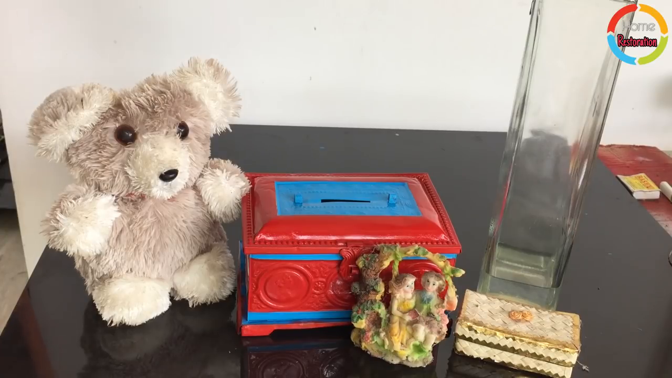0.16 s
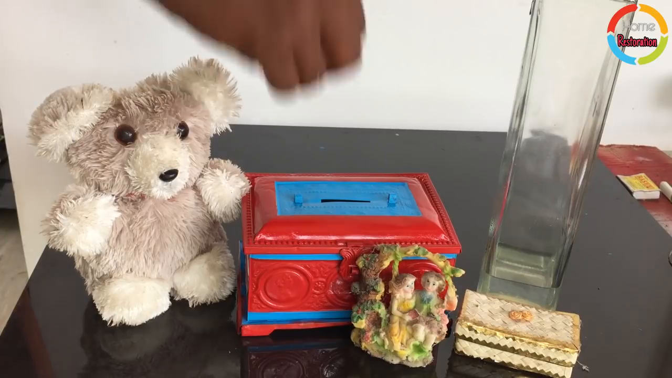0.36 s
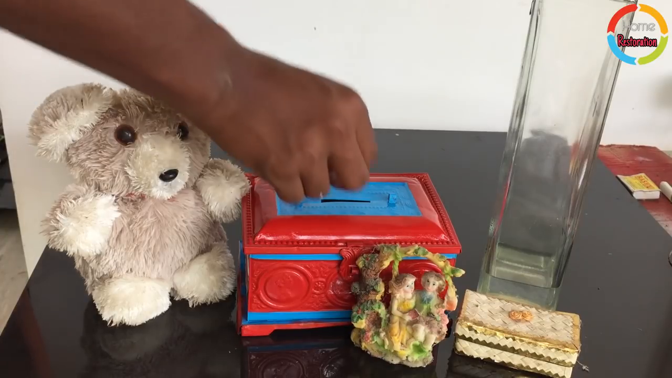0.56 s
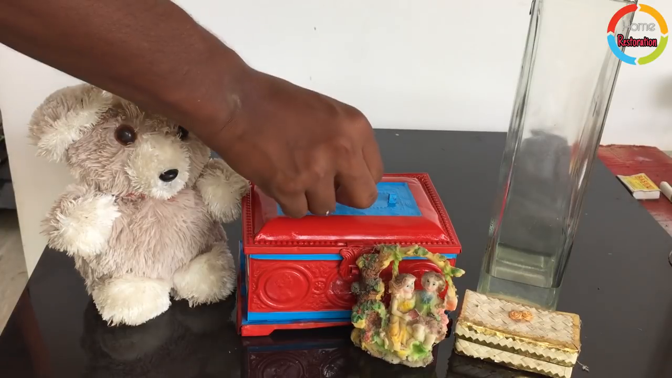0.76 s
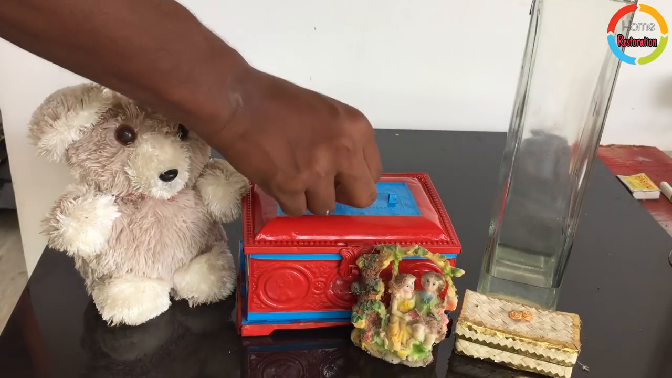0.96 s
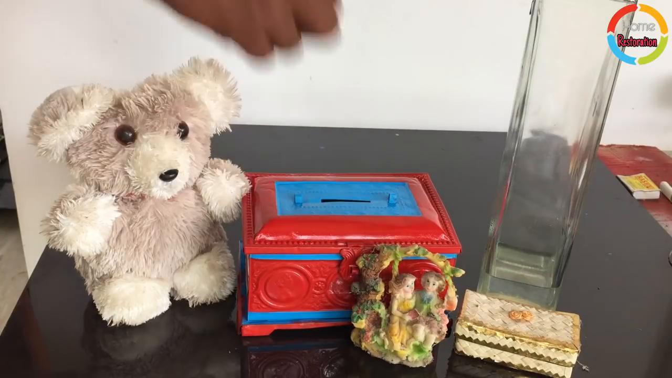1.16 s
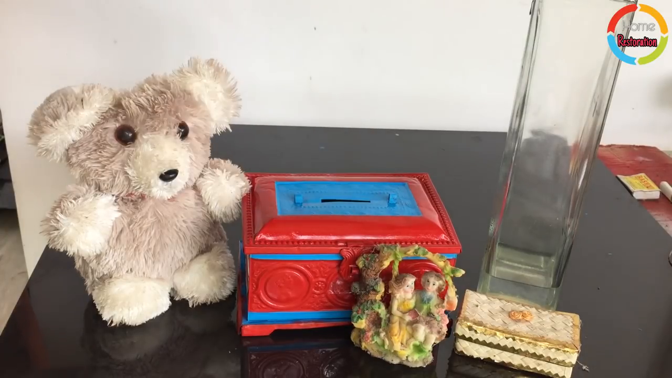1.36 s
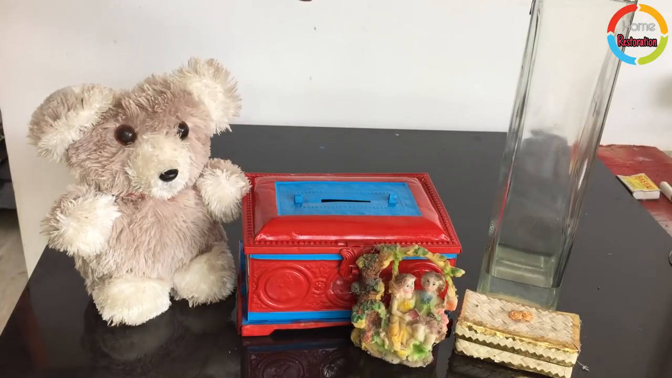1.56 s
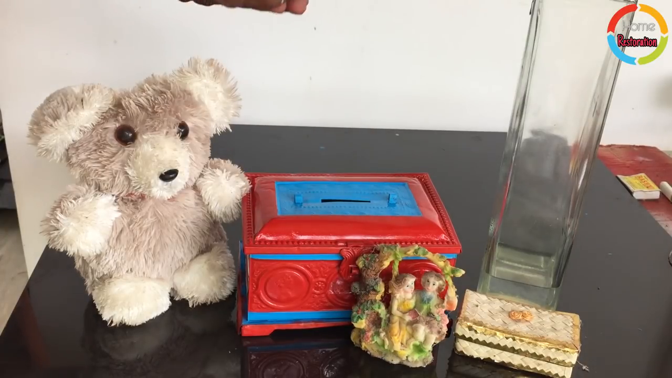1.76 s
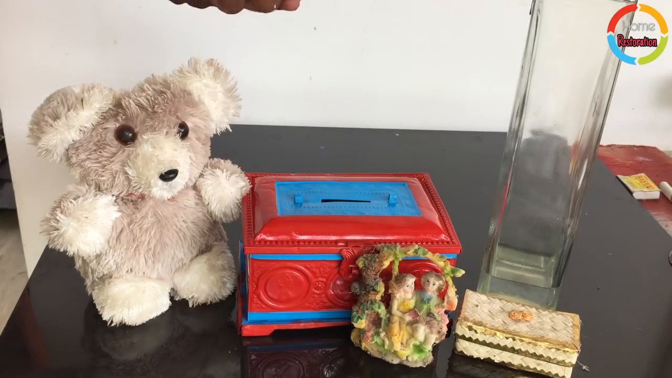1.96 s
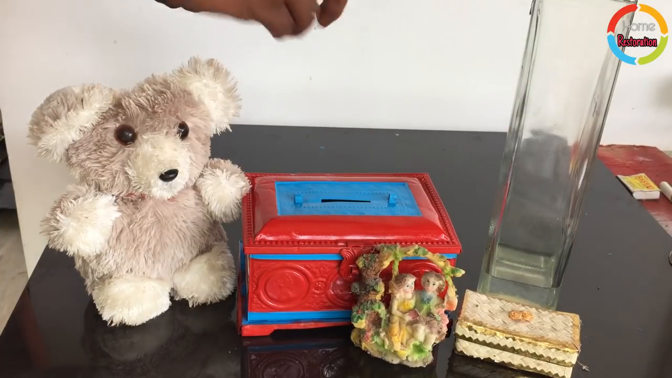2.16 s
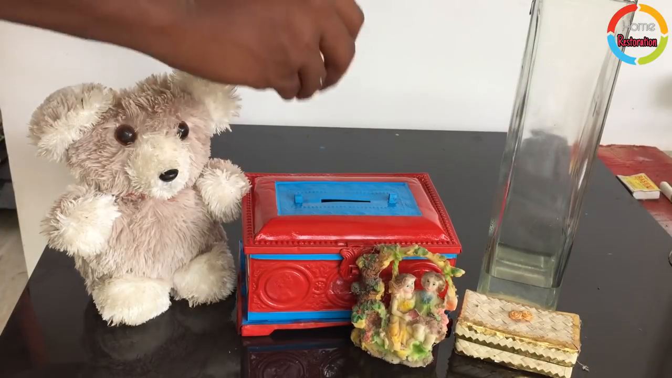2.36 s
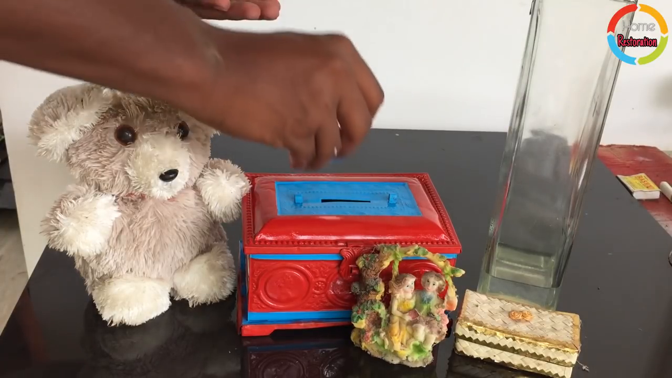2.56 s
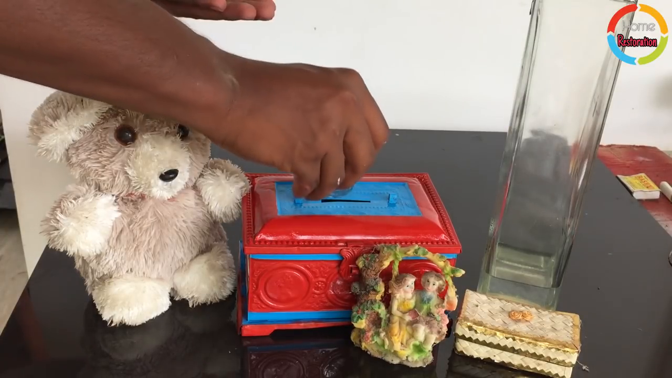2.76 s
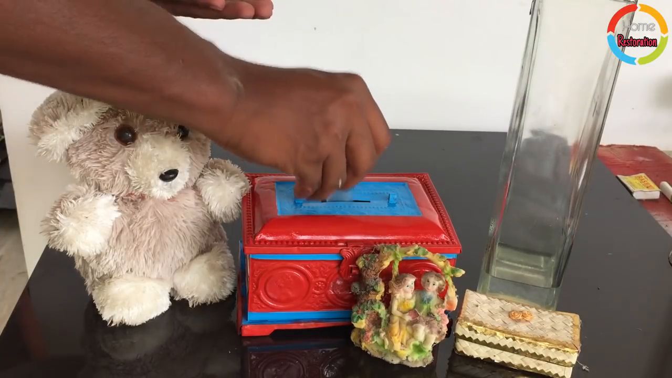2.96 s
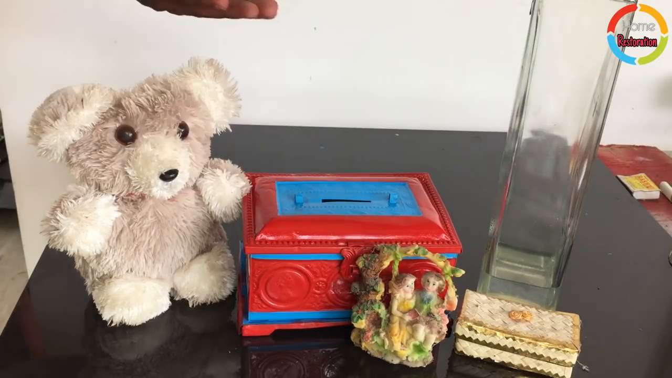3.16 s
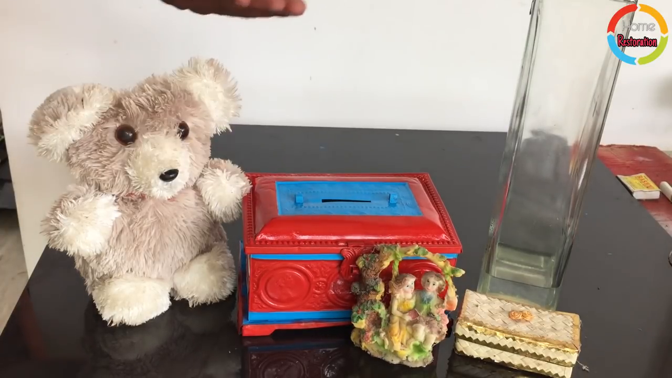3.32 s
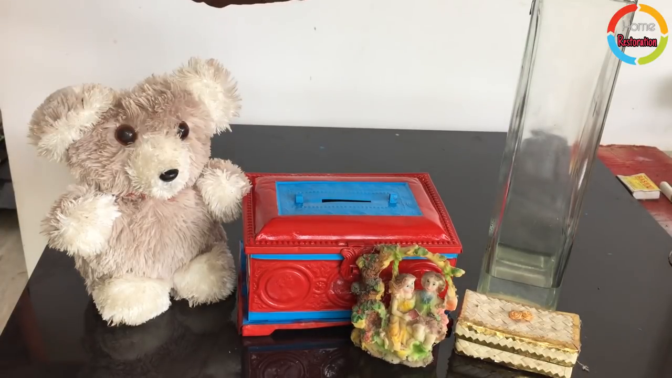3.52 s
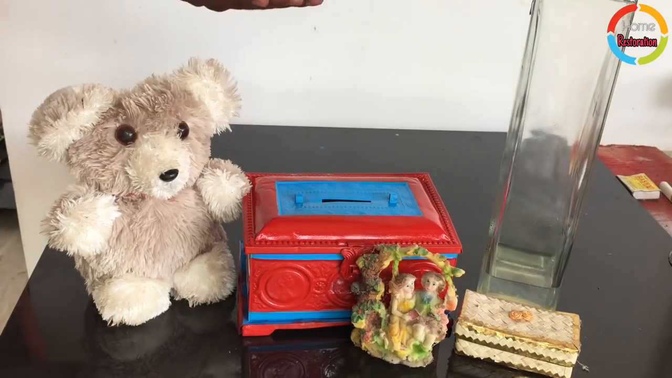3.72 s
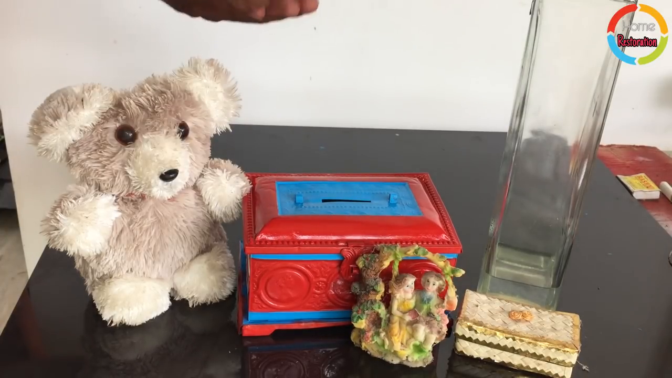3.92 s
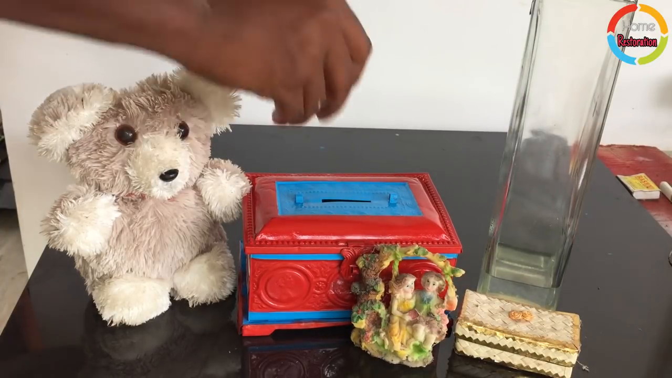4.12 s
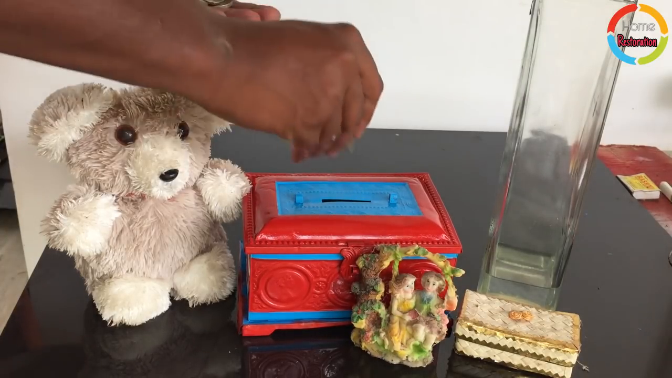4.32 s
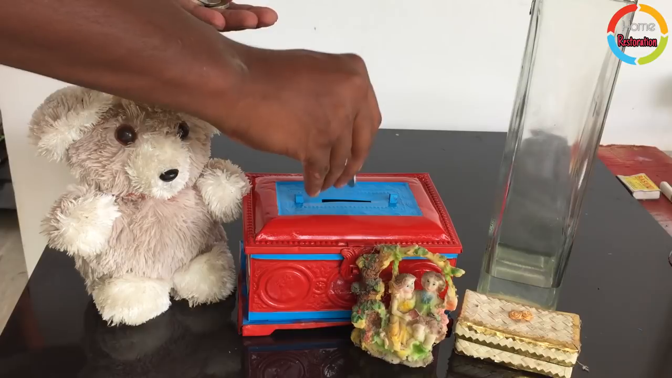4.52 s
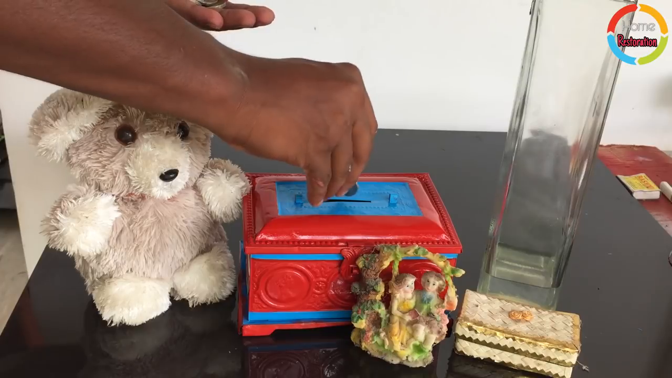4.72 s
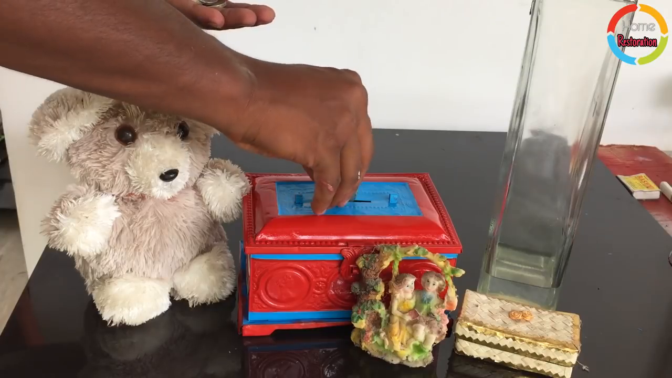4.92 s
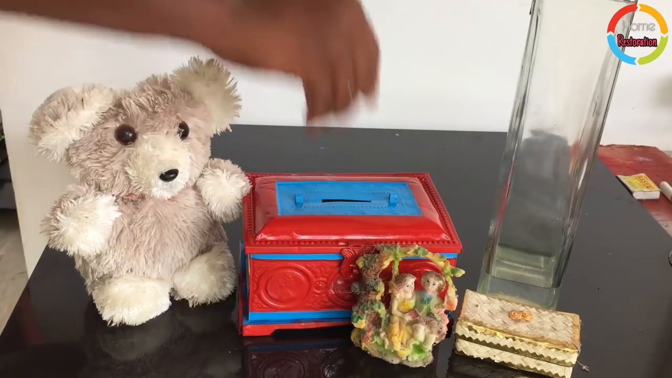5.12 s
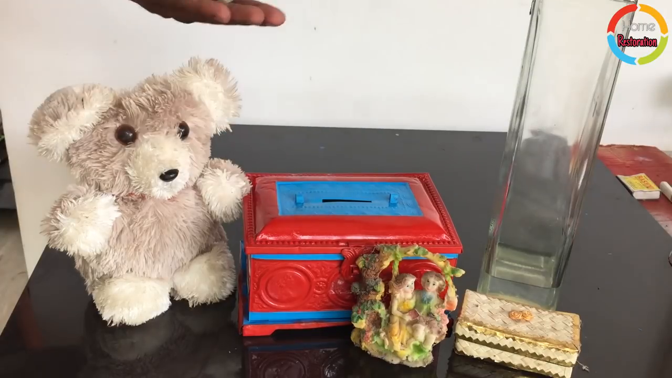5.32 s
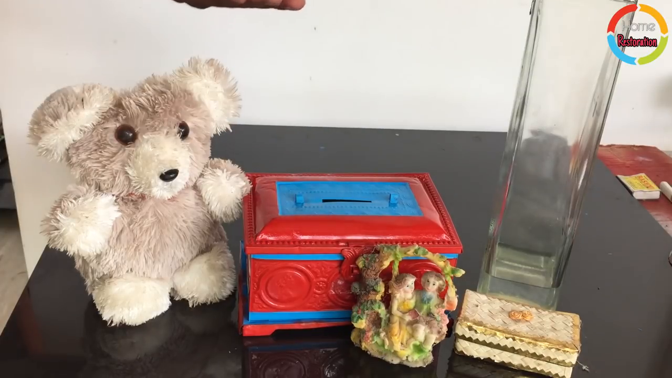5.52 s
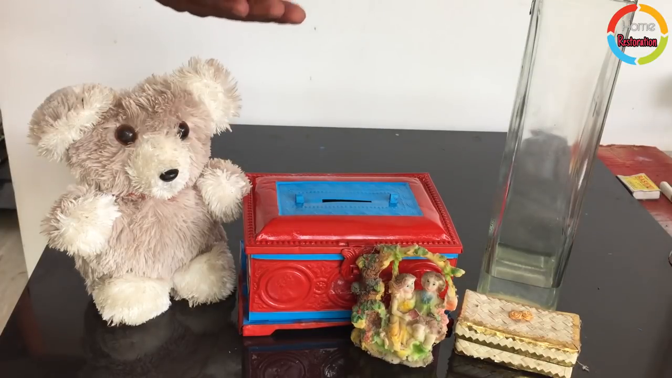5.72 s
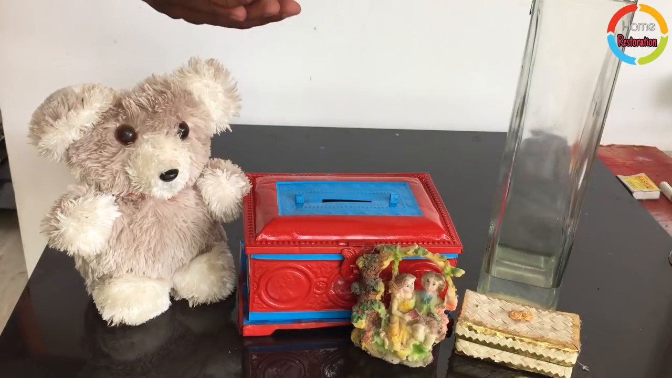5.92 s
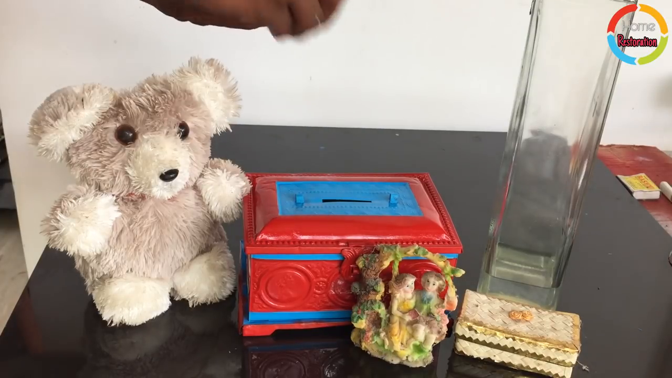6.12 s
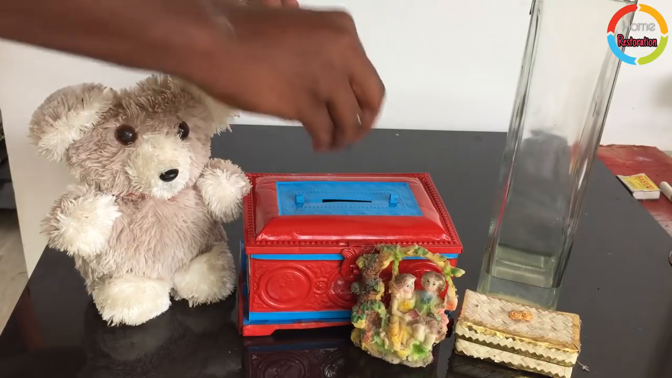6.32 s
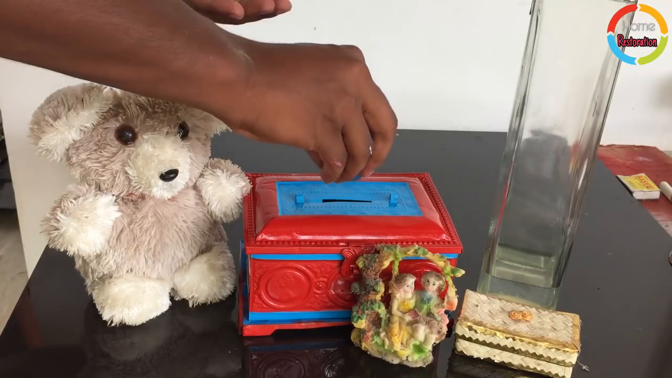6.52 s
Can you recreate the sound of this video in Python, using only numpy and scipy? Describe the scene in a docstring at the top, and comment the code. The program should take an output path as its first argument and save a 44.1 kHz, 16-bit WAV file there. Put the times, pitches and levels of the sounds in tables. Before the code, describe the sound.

Three coins drop one by one into a small plastic money box, each cracking on its floor, bouncing and rattling briefly to rest.

```python
"""Three coins drop one by one through the lid slot of a small plastic money box on a table.
Each rubs and knocks on the lid, then bounces on the hard floor: a dry crack plus the damped modes of the box.
Tiny rim contacts in ever quicker leans rock it to rest; grazes at the slot and a high coin ring are added.
In the hand, further off, coins slide and clink as uneven runs of ticks with a very high ring.
A short diffuse room echo lies on both; behind them filtered noise makes a swelling rumble and a thin hiss."""
import sys
import numpy as np
from scipy import signal
from scipy.fft import rfft, irfft, next_fast_len
from scipy.io import wavfile
from scipy.ndimage import uniform_filter1d

SR = 44100
rng = np.random.default_rng(int(sys.argv[2]) if len(sys.argv) > 2 else 0)


def inscribe(sig):
    """Save sig as 16-bit PCM at rate SR to the path in sys.argv[1].

    A 1-D sig is mono; a 2-D sig holds one channel per row.
    Samples are clipped to [-1, 1] before scaling.
    """
    pcm = np.round(np.clip(np.atleast_2d(sig).T, -1, 1) * 32767)
    wavfile.write(sys.argv[1], SR, pcm.astype(np.int16))


N = 294588
RING_SIZE = 16384  # samples in one ringing sound
AGE = np.arange(RING_SIZE) / SR  # seconds since its start


def undb(db):
    """Decibels to gain."""
    return 10 ** (np.asarray(db) / 20)


def unit(x):
    """Scale to rms 1."""
    return x / np.sqrt(np.mean(x ** 2))


def burst(x):
    """Scale so that the loudest hundredth of a second has rms 1."""
    return x / np.sqrt(uniform_filter1d(x ** 2, size=441).max())


def along(points, hz):
    """Read (Hz, value) points on a log-frequency axis."""
    f, value = np.transpose(points)
    return np.interp(np.log(hz + 1), np.log(f), value)


def freqs(x):
    """Frequency of each spectral bin of x."""
    return np.arange(len(x) // 2 + 1) * SR / len(x)


def colour(x, db):
    """Causal (minimum-phase) filter with the given dB for each bin."""
    half = len(x) // 2
    cepstrum = irfft(np.log(undb(db)), len(x))
    # folding the cepstrum forward keeps the response from starting early
    cepstrum[1:half] *= 2
    cepstrum[half + 1:] = 0
    return irfft(rfft(x) * np.exp(rfft(cepstrum)), len(x))


def shaped(x, points):
    """Filter x by a curve of (Hz, dB) points."""
    return colour(x, along(points, freqs(x)))


def fade(t60):
    """Exponential decay that falls 60 dB in t60 seconds."""
    return np.exp(-np.log(1000) * AGE / max(t60, 1e-3))


def tail(noise, t60s):
    """Noise that dies away at its own pace in each band."""
    spectrum, out = rfft(noise), 0
    hz, times = np.transpose(t60s)
    for t60, share in zip(times, np.eye(len(hz))):
        band = along(np.column_stack([hz, share]), freqs(noise))
        out = out + fade(t60) * irfft(spectrum * band, len(noise))
    return out


def ring(modes, scatter_db):
    """Damped modes, each with a random phase and a scattered level, as from blows in different spots."""
    out = 0
    for hz, db, t60 in modes:
        level = undb(db + scatter_db * rng.standard_normal())
        out = out + level * fade(t60) * np.sin(2 * np.pi * (hz * AGE + rng.random()))
    return out


def chatter(length, rate, scatter_db, first=0.9):
    """A first touch, then a short run of tiny uneven contacts that swells and ebbs."""
    contacts = rng.random(RING_SIZE) < rate / SR  # rate in contacts per second
    progress = np.clip(AGE / max(length, 1e-3), 0, 1)
    swell = np.sqrt(np.sin(np.pi * progress).clip(0))
    strength = undb(scatter_db * rng.standard_normal(RING_SIZE))
    pushes = contacts * swell * strength * rng.choice([-1, 1], RING_SIZE)
    pushes[0] = first
    return pushes


def drive(pushes, response):
    """The ring of a body under a run of pushes."""
    return signal.fftconvolve(pushes, response)[:RING_SIZE]


def add(out, s, x):
    """Mix x in at s seconds."""
    i = max(int(s * SR), 0)
    out[i:i + len(x)] += x[:len(out) - i]


def narrow(hz, width, size):
    """A wavering tone: noise through one sharp resonance, at half amplitude width Hz off centre."""
    noise = rng.standard_normal(size)
    return unit(irfft(rfft(noise) / (1 + ((freqs(noise) - hz) / width) ** 2), size))


def background():
    """Coloured noise: a low, humming rumble that swells now and then, and an even hiss with two faint whines."""
    # Spectrum of the rumble. Each row: frequency in Hz, density in dB per Hz.
    rumble_colour = [(15, -62), (25, -30.5), (34, -18.5), (46, -7), (59, 0.5), (70, 2.5), (85, -3.5),
                     (124, -13.5), (155, -5), (173, -4.5), (226, -22), (330, -33), (430, -59.5),
                     (730, -120)]
    # Core of the rumble: frequency in Hz, width in Hz, level in dB against the broad rumble.
    drone_hz, drone_width, drone_db = (71, 4, -6.5)
    # Higher hum that comes out in the swells: frequency in Hz, width in Hz, level in dB against the rumble.
    hum_hz, hum_width, hum_db = (140, 4, -24)
    # Swells of the rumble. Each row: peak in seconds, half width in seconds, rise in dB.
    swells = [(1.78, .6, 10.5), (3.451, .25, 4), (4.38, 0.36, 4.5)]
    # Spectrum of the steady hiss. Each row: frequency in Hz, density in dB per Hz.
    hiss_colour = [(100, -6), (400, -9.5), (1500, -13.5), (3000, -15), (5100, -21), (6400, -1.5), (7200, 0),
                   (8000, -15), (8900, -23.5), (9600, -16), (10300, -12), (11000, -20.5), (11800, -27),
                   (16000, -29)]
    # Narrow bands in the hiss. Each row: frequency in Hz, width in Hz, level in dB.
    whine_bands = [(5525, 35, -75.5), (5900, 110, -83.5)]
    rumble_db, hiss_db = -58.5, -61.5

    size = next_fast_len(N, True)
    t = np.arange(size) / SR
    swell_db = sum(db * np.exp(-((t - s) / width) ** 2) for s, width, db in swells)
    rumble = unit(shaped(rng.standard_normal(size), rumble_colour))
    rumble = rumble + undb(drone_db) * narrow(drone_hz, drone_width, size)
    # the hum takes the swell twice, here and with the rumble
    hum = undb(hum_db + swell_db) * narrow(hum_hz, hum_width, size)
    hiss = undb(hiss_db) * unit(shaped(rng.standard_normal(size), hiss_colour))
    whines = sum(undb(db) * narrow(hz, width, size) for hz, width, db in whine_bands)
    return ((rumble + hum) * undb(rumble_db + swell_db) + hiss + whines)[:N]


def jingle(touches, ring_db, click_t60=0.052, ring_t60=0.035, detune=.01):
    """Coin on coin: dry ticks with a very high, damped ring, tuned a little differently each time."""
    # Spectrum of a coin held in the fingers. Each row: frequency in Hz, density in dB per Hz.
    clink_colour = [(400, -72), (1300, -28), (1900, -15), (3500, -11.5), (5200, -3.5), (7000, -2.5),
                    (9300, -1), (11000, -8), (13500, -9.5), (15500, -5.5)]
    # Ringing modes of held coins before detuning: frequencies in Hz.
    clink_hz = [14300, 14450, 14600, 14900, 15300]
    tick = shaped(rng.standard_normal(RING_SIZE) * fade(click_t60), clink_colour)
    modes = [(hz * (1 + detune * rng.standard_normal()), 0, ring_t60) for hz in clink_hz]
    metal = ring(modes, scatter_db=3)
    return burst(burst(drive(touches, tick)) + undb(ring_db) * burst(drive(touches, metal)))


def hand():
    """The next coin is picked from the palm: uneven sliding and a few sharp clicks."""
    # Coins slide over each other. Each row: start in seconds, length in seconds, level in dB,
    # ring in dB against the ticks.
    shuffles = [(0.003, 0.03, -44.5, -4), (0.127, 0.15, -46.5, -4.5), (0.264, 0.059, -43, -3),
                (1.777, 0.11, -53.5, -22), (1.972, 0.044, -38.5, 5), (3.719, 0.053, -57, -6.5),
                (3.945, 0.061, -43.5, -12), (5.7, 0.031, -49, -4), (5.957, 0.029, -38.5, -24)]
    # One coin clicks on another. Each row: start in seconds, level in dB, ring in dB against the ticks.
    clinks = [(1.986, -35.5, 2), (2.036, -40.5, 2), (3.712, -40.5, 6), (4.043, -53.5, -16),
              (5.731, -38.5, -27), (5.932, -46.5, -13), (5.953, -50, -22), (6.002, -44.5, -18.5),
              (6.010, -43, -19)]
    clink_s = 0.0025  # how long a click chatters
    out = np.zeros(N)
    for s, length, db, ring_db in shuffles:
        touches = chatter(length, rate=600, scatter_db=5.5)
        add(out, s, undb(db) * jingle(touches, ring_db))
    for s, db, ring_db in clinks:
        touches = chatter(clink_s, rate=900, scatter_db=5.0, first=2.5)
        add(out, s, undb(db) * jingle(touches, ring_db))
    return out


def blow(walls, modes, modes_db, own_db=2, scatter_db=2):
    """One blow on the plastic: its main modes and a crowd of small ones, partly the same at every spot."""
    # Spectrum of the crowded smaller modes. Each row: frequency in Hz, density in dB per Hz.
    crowd_colour = [(45, -40), (190, -11.5), (290, -4), (600, 2), (960, -3), (1140, -10), (1420, 2),
                    (1670, -6.5), (2200, -2), (4200, -8), (8200, -9.5), (10300, -17.5), (12500, -13),
                    (16000, -25.5)]
    # Their decay. Each row: frequency in Hz, t60 in seconds.
    crowd_t60 = [(150, 0.1), (500, 0.17), (1200, 0.19), (3000, 0.12), (7000, 0.087), (14000, 0.056)]
    stir = walls + undb(own_db) * rng.standard_normal(RING_SIZE)
    crowd = shaped(tail(stir, crowd_t60), crowd_colour)
    return burst(crowd) + undb(modes_db) * burst(ring(modes, scatter_db))


def cushioned(walls, soft_hz):
    """A touch on the lid, dulled by the fingers that hold the coin."""
    # Modes of the lid with fingers on it. Each row: frequency in Hz, level in dB, t60 in seconds.
    lid_modes = [(318, -1, .15), (404, -4, .14), (578, -1, .16), (800, -2, .12), (870, 0, .15),
                 (925, -3, .13), (1290, -4, .12), (1800, -4, .12), (1985, -4, .12), (2240, -4, .13),
                 (2825, -5, .12), (3280, -7, .1), (3480, -5, .12), (4470, -12, .1)]
    sound = blow(walls, lid_modes, modes_db=4.0)
    return colour(sound, -20 * np.log10(1 + (freqs(sound) / soft_hz) ** 2))


def lid(walls):
    """The coin knocks and rubs on the lid as it finds the slot."""
    # Soft knocks of fingers and coin. Each row: start in seconds, level in dB, muffled above in Hz.
    knocks = [(0.921, -41.5, 1089), (1.108, -44, 4500), (3.016, -37.5, 1400), (3.08, -38, 4505),
              (4.996, -40, 1795), (5.045, -49, 1804), (5.119, -45.5, 3293), (5.132, -45, 3400)]
    # The coin rubs towards the slot. Each row: start in seconds, length in seconds, level in dB,
    # muffled above in Hz.
    rubs = [(0.92, 0.15, -46, 1152), (3.03, 0.042, -44.5, 1900), (5.0, 0.11, -49, 1400)]
    out = np.zeros(N)
    for s, db, soft_hz in knocks:
        add(out, s, undb(db) * burst(cushioned(walls, soft_hz)))
    for s, length, db, soft_hz in rubs:
        slips = chatter(length, rate=220, scatter_db=4.0)
        add(out, s, undb(db) * burst(drive(slips, cushioned(walls, soft_hz))))
    return out


def floor_modes(s):
    """The box modes as stirred by the coin that is falling at s seconds."""
    # Modes of the box, stirred differently where each coin lands. Each row: frequency in Hz,
    # t60 in seconds, then the level in dB for the first, second and third coin.
    box_modes = [(298, .14, -8, -7, -7), (398, .11, -16, -7, -4), (463, .15, -14, -9, -9),
                 (578, .14, -13, -1, -2), (798, .11, -5, -3, -1), (870, .14, -4, -4, -6),
                 (958, .17, -7, -7, -7), (1015, .13, -7, -6, -8), (1356, .12, -7, -4, -1),
                 (1478, .11, -5, -6, -8), (1809, .1, -6, -8, -7), (1927, .09, -11, -9, -8),
                 (2045, .09, -13, -1, -9), (2110, .09, -3, -3, -9), (2203, .09, 1, -11, -6),
                 (2330, .08, -10, -6, -5), (2428, .1, -6, -9, -8), (2573, .09, -15, -9, -10),
                 (2793, .08, -14, -8, -10), (3039, .09, -15, -3, 0), (3470, .1, -20, -8, -4),
                 (3655, .08, -10, -9, -7), (3892, .08, -14, -5, -12), (4184, .08, -13, -5, -5),
                 (4349, .07, -13, -10, -3), (4462, .08, -4, -5, -12), (5065, .07, -15, -12, -13),
                 (5345, .07, -14, -15, -11), (6950, .07, -13, -14, -20), (8250, .06, -17, -17, -15)]
    # When each coin's turn begins, in seconds.
    drop_s = [.8, 2.9, 4.9]
    coin = np.searchsorted(drop_s, s) - 1
    return [(hz, levels[coin], t60) for hz, t60, *levels in box_modes]


def box(walls, s, bass_db, treble_db, modes_db, crack_db, bass_hz=600, treble_hz=6500, crack_t60=0.0085):
    """A coin meets the floor of the box: a flat landing pushes the bass, an edge landing the treble."""
    # Spectrum of the hard contact itself. Each row: frequency in Hz, density in dB per Hz.
    crack_colour = [(300, -34.5), (1500, -4.5), (4000, -0.5), (9000, -3), (16000, -3.5)]
    crack = shaped(rng.standard_normal(RING_SIZE) * fade(crack_t60), crack_colour)
    sound = burst(blow(walls, floor_modes(s), modes_db)) + undb(crack_db) * burst(crack)
    hz = freqs(sound)
    bass_shelf = bass_db / (1 + (hz / bass_hz) ** 2)
    treble_shelf = treble_db * hz ** 2 / (hz ** 2 + treble_hz ** 2)
    return burst(colour(sound, bass_shelf + treble_shelf))


def bounces(walls):
    """Each coin strikes the floor with one rim, then slaps down with the other, later when it is slower."""
    # Landings and bounces on the floor. Each row: start in seconds, level in dB before the common lift
    # in the scene, bass tilt in dB, treble tilt in dB.
    strikes = [(1.187, -14, 0.5, -0.5), (1.293, -18.5, -4.5, 0.5), (1.381, -22.5, -3.5, 5),
               (3.194, -12, 1.5, 1.5), (3.237, -30, -18, -5), (3.314, -20.5, 3.5, -1), (3.347, -18, 2, 1),
               (3.484, -33.5, -1, 1), (5.282, -13, -1, 1.5), (5.332, -21.5, -2.5, 0),
               (5.373, -17.5, 0.5, 0), (5.450, -35.5, -18, -14), (5.571, -30.5, -7, -9),
               (5.615, -28.5, -13, -9)]
    full_drop_db = -12  # a strike this loud slaps after exactly slap_s seconds
    slap_db, slap_s, slap_lag_power = -4, .0045, .65
    out = np.zeros(N)
    for s, db, bass_db, treble_db in strikes:
        lag = slap_s * undb(full_drop_db - db) ** slap_lag_power
        for when, touch_db in [(s, db), (s + lag, db + slap_db)]:
            touch = box(walls, s, bass_db, treble_db, modes_db=0.5, crack_db=-12.5)
            add(out, when, undb(touch_db) * touch)
    return out


def rocking(walls, bass_db=-1.5, bright_db=-5.5, rate=3000, scatter_db=3.5):
    """The rim rolls in tiny contacts that press and ease with each lean, ever faster until the coin lies flat."""
    # Coins rocking to rest. Each row: start in seconds, lies flat after in seconds, first lean in seconds,
    # level in dB, change per lean in dB, treble tilt in dB on top of bright_db.
    rockings = [(1.41, .08, .06, -46, -3, -15), (3.403, .248, .0625, -26.8, 0.3, -4.5),
                (5.424, .25, .067, -27, 1.6, -9)]
    lean_shrink = .85  # each lean lasts this share of the one before
    lean_dip_db = 18.5  # how much more lightly the rim touches between two leans
    out = np.zeros(N)
    for s, length, period, db, change_db, treble_db in rockings:
        sway = np.clip(1 - AGE * (1 - lean_shrink) / period, 1e-3, 1)
        lean = np.log(sway) / np.log(lean_shrink)  # running count of leans
        press_db = change_db * lean - lean_dip_db * np.cos(np.pi * lean) ** 2
        contacts = (rng.random(RING_SIZE) < rate / SR) * rng.choice([-1, 1], RING_SIZE) * (AGE < length)
        pushes = contacts * undb(press_db + scatter_db * rng.standard_normal(RING_SIZE))
        touch = box(walls, s, bass_db, treble_db + bright_db, modes_db=-3, crack_db=-11.5)
        add(out, s, undb(db) * burst(drive(pushes, touch)))
    return out


def slot(walls):
    """The falling coin ticks against the slot and slides along its edge."""
    # The coin is let go and grazes the edge. Each row: start in seconds, level in dB, slides for in seconds,
    # bass tilt in dB, treble tilt in dB.
    grazes = [(3.123, -32.5, 0.0018, -2.5, -15.5), (5.163, -28, 0.043, 5.5, -7)]
    out = np.zeros(N)
    for s, db, length, bass_db, treble_db in grazes:
        pushes = chatter(length, rate=690, scatter_db=5.5, first=5.2)
        touch = box(walls, s, bass_db, treble_db, modes_db=-2.5, crack_db=-12)
        add(out, s, undb(db) * burst(drive(pushes, touch)))
    return out


def coin_rings(choke_s=.009):
    """A cleanly struck coin rings in the air until it lands again and is choked."""
    # Rings of the free coin. Each row: start in seconds, level in dB, t60 in seconds, free for in seconds.
    free_rings = [(5.164, -58, .3, .11), (5.282, -33.5, 0.7, 0.092)]
    # Modes of the free coin: frequencies in Hz.
    coin_hz = [14298, 14460]
    out = np.zeros(N)
    for s, db, t60, free_s in free_rings:
        choke = np.exp(-np.maximum(AGE - free_s, 0) / choke_s)
        metal = ring([(hz, 0, t60) for hz in coin_hz], scatter_db=1)
        add(out, s, undb(db) * choke * burst(metal))
    return out


def room(x, wet_db, delay_s=0.0025):
    """A short diffuse echo from the near walls: noise that decays at its own pace in each band."""
    t60s = [(300, 0.62), (1500, 0.25), (5000, 0.29), (14000, 0.28)]  # (Hz, seconds)
    echo = tail(rng.standard_normal(RING_SIZE), t60s)
    echo = echo * np.clip(AGE / delay_s - 1, 0, 1)  # silent up to the delay, full at twice the delay
    return x + undb(wet_db) * signal.fftconvolve(x, echo / np.linalg.norm(echo))[:N]


def scene(bounce_db=.5):
    """Box and hand in the room; the hand is further off, so more of it comes by way of the walls."""
    walls = rng.standard_normal(RING_SIZE)  # the part of every blow that is the same at all spots
    money_box = undb(bounce_db) * bounces(walls) + rocking(walls) + slot(walls) + coin_rings() + lid(walls)
    return (room(money_box, wet_db=-19.5) + room(hand(), wet_db=-13.0) + background())[None]


def record(dry, ceiling=0.91, low_cut_hz=38, top_hz=15950):
    """The recorder drops the deepest bass, rounds the loudest peaks and cuts the top."""
    low_cut = signal.butter(2, low_cut_hz, "highpass", fs=SR, output="sos")
    top_cut = signal.ellip(10, .2, 70, top_hz, fs=SR, output="sos")
    sound = signal.sosfilt(low_cut, dry)
    rounded = ceiling * np.tanh(sound / ceiling)
    return signal.sosfilt(top_cut, rounded)


dry = scene()
out = record(dry)
inscribe(out)
```